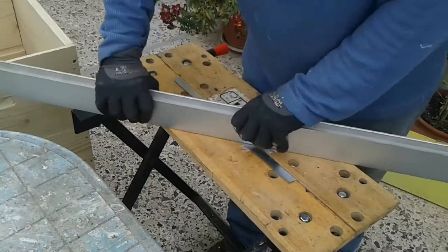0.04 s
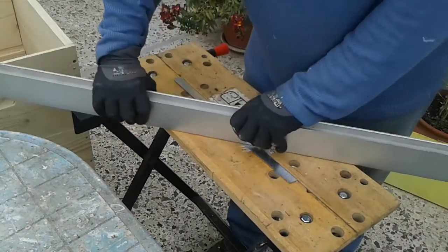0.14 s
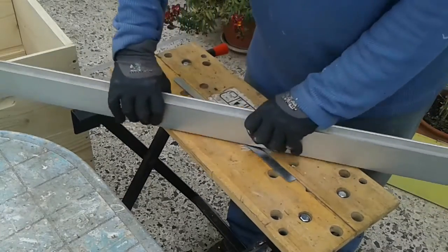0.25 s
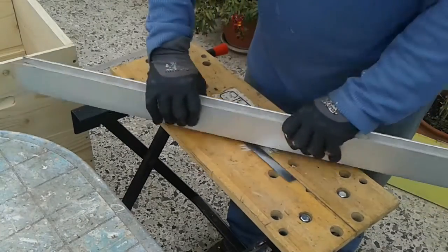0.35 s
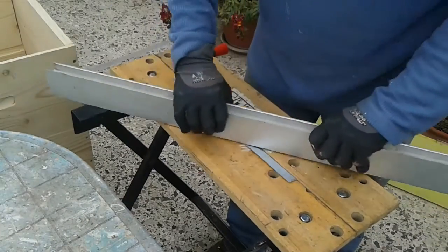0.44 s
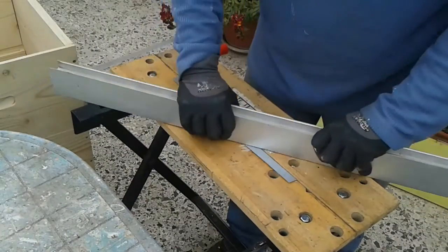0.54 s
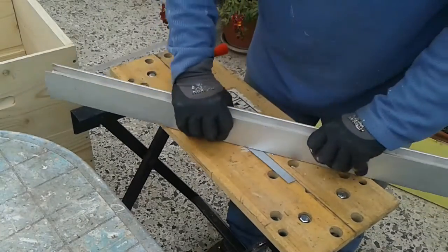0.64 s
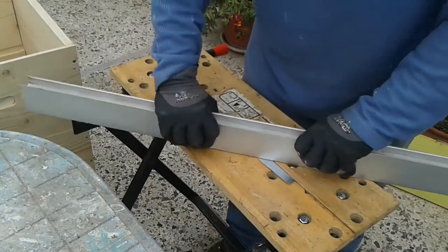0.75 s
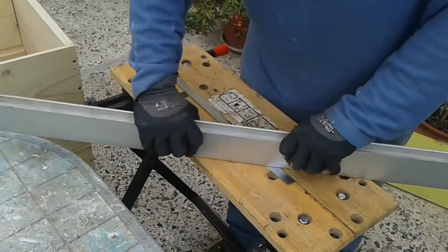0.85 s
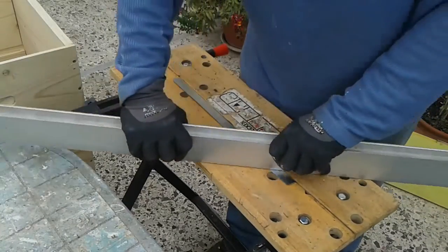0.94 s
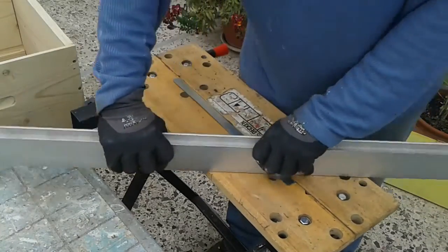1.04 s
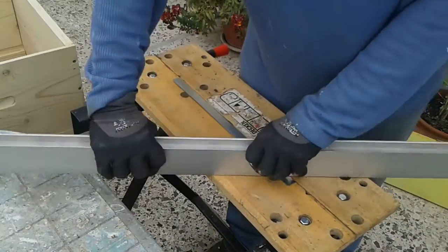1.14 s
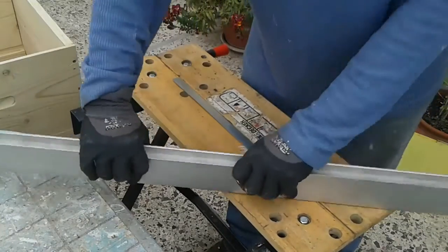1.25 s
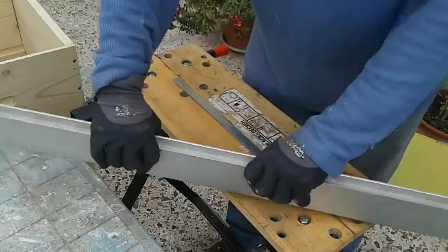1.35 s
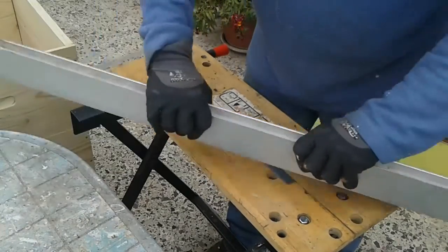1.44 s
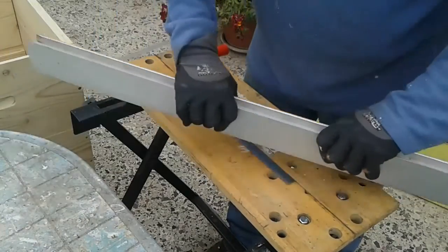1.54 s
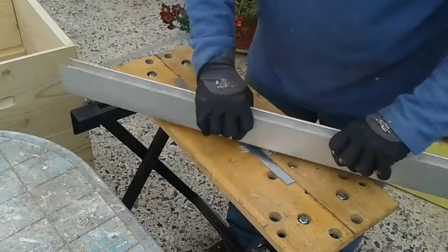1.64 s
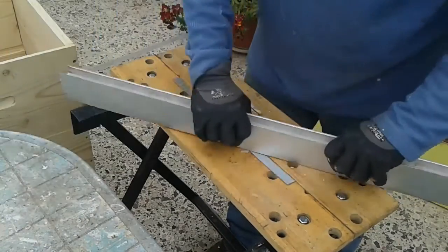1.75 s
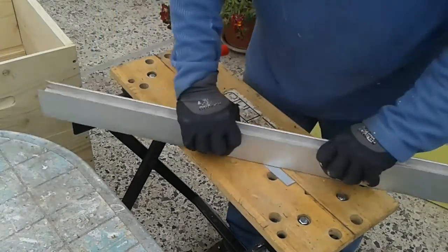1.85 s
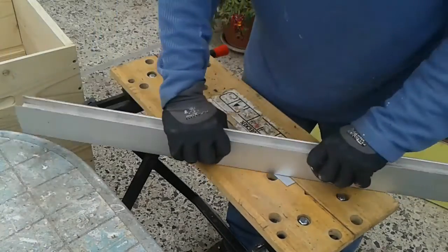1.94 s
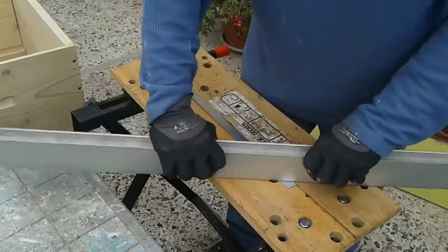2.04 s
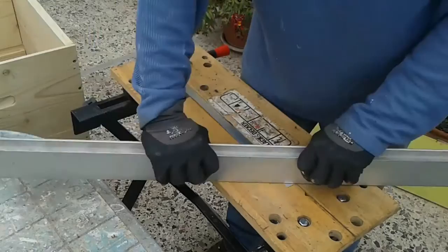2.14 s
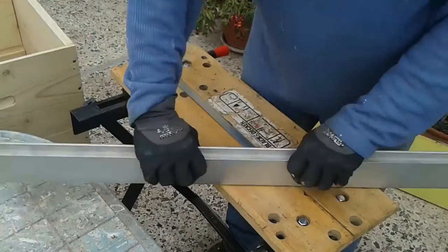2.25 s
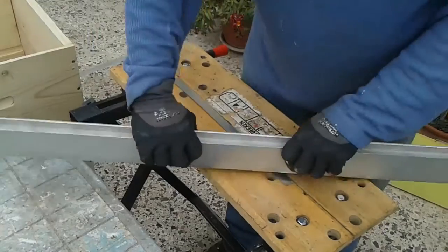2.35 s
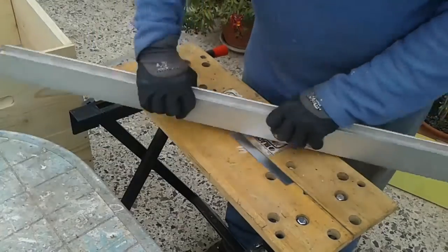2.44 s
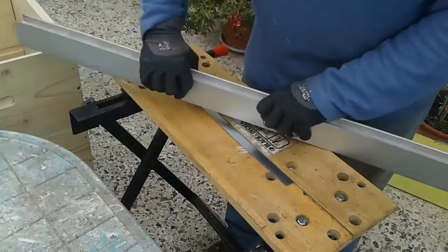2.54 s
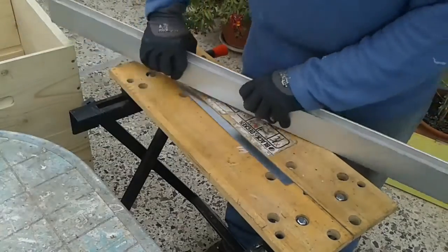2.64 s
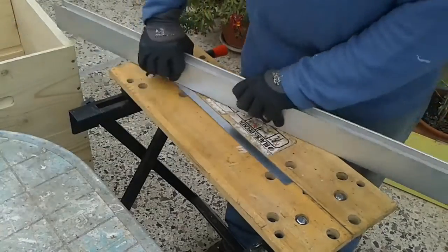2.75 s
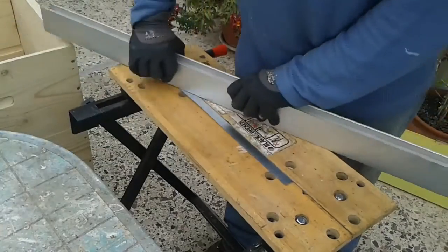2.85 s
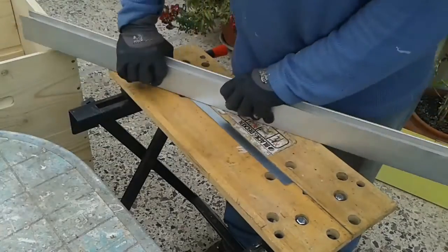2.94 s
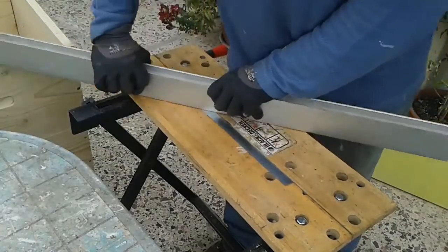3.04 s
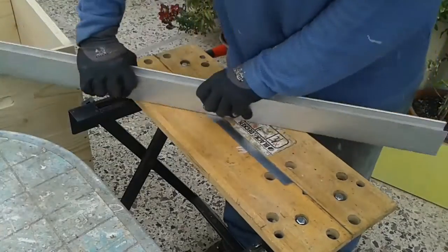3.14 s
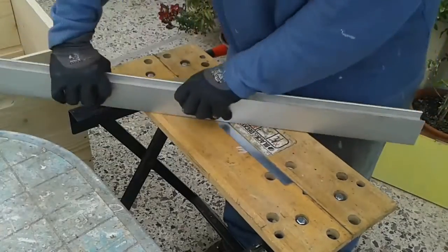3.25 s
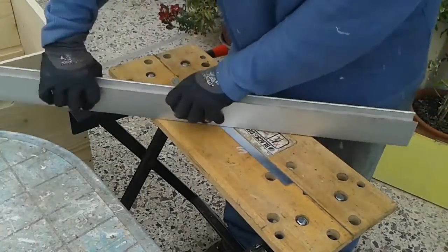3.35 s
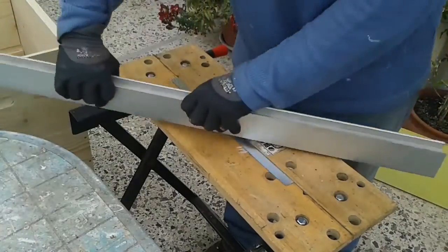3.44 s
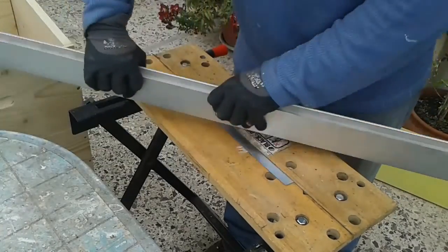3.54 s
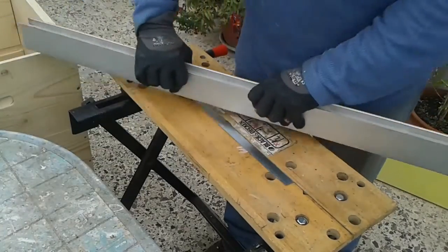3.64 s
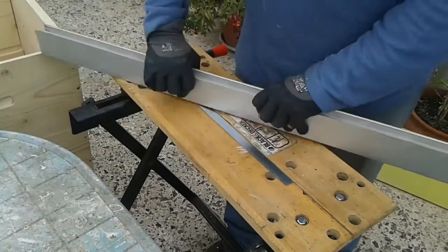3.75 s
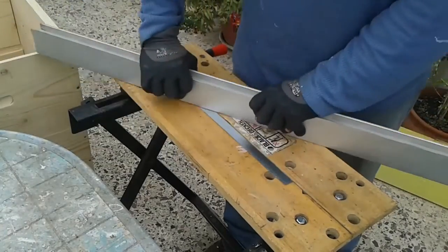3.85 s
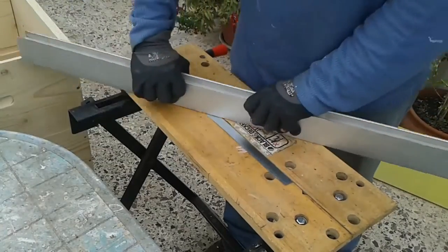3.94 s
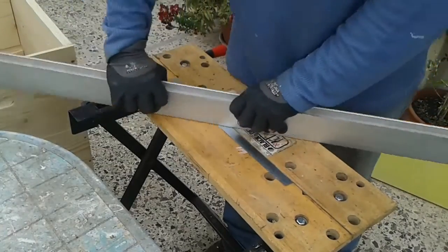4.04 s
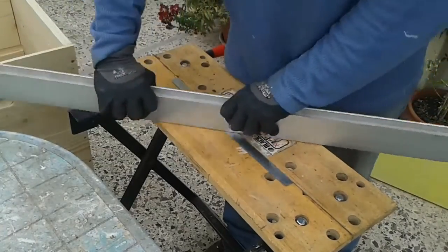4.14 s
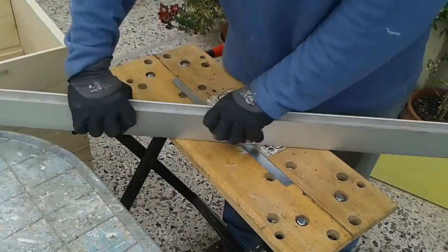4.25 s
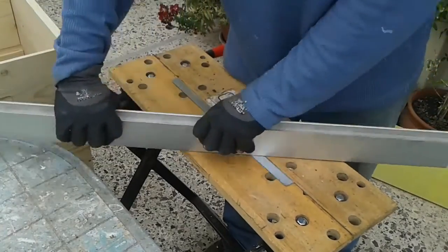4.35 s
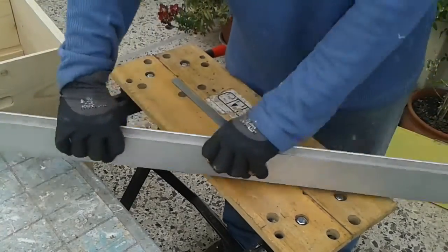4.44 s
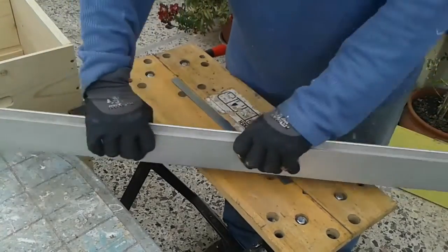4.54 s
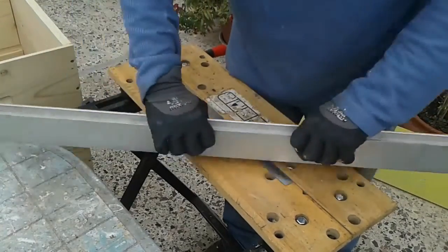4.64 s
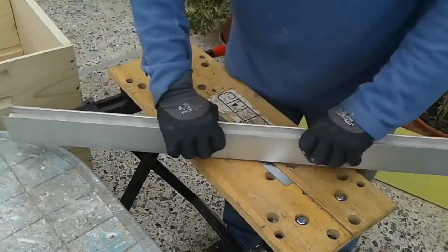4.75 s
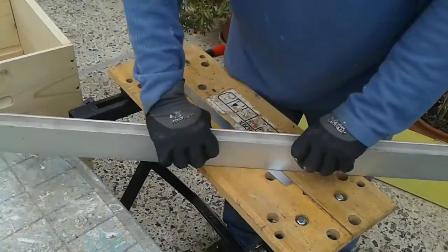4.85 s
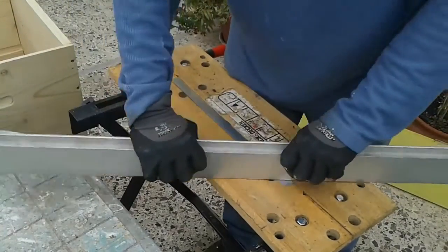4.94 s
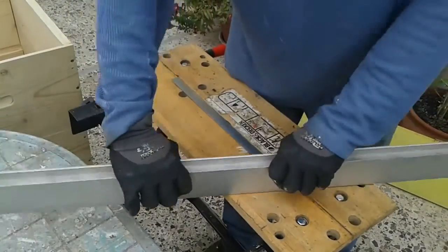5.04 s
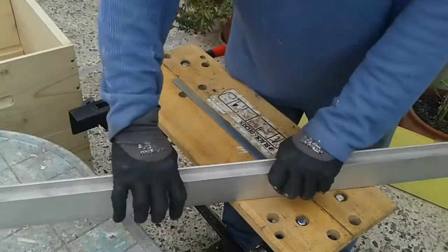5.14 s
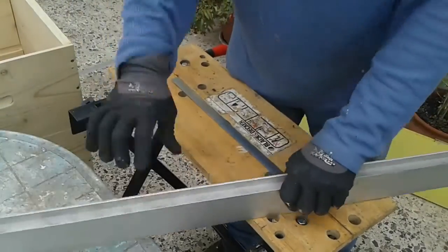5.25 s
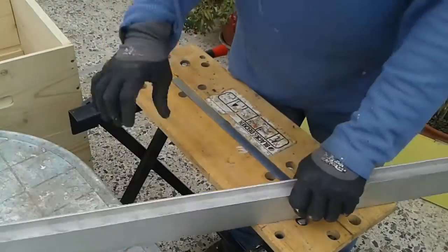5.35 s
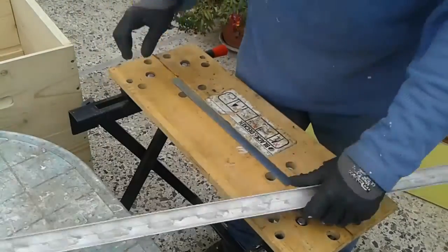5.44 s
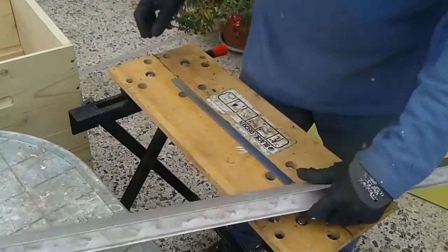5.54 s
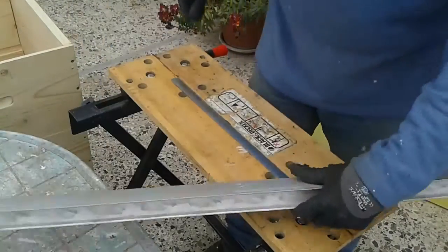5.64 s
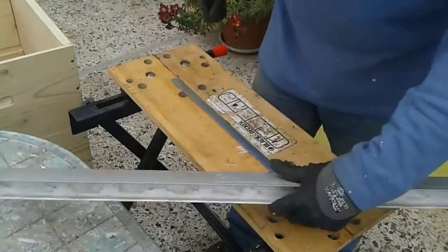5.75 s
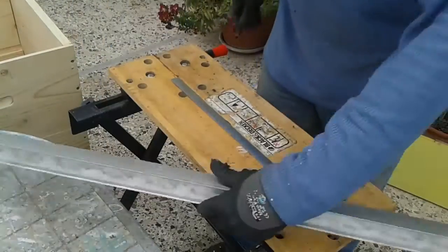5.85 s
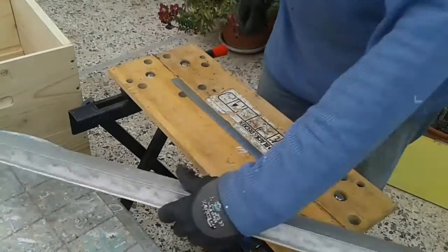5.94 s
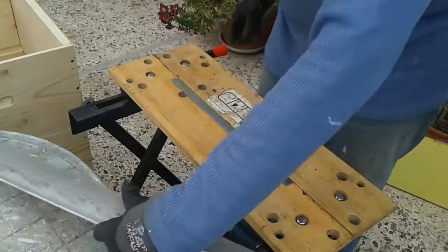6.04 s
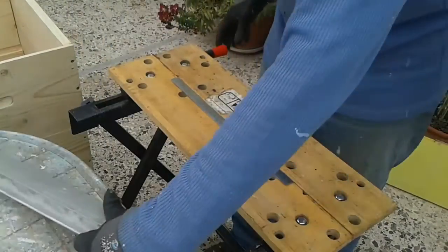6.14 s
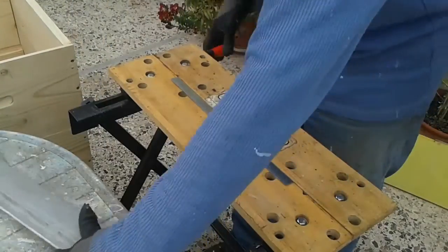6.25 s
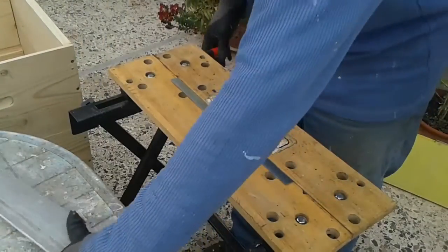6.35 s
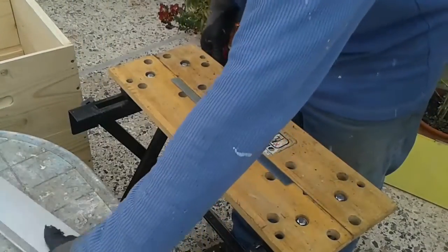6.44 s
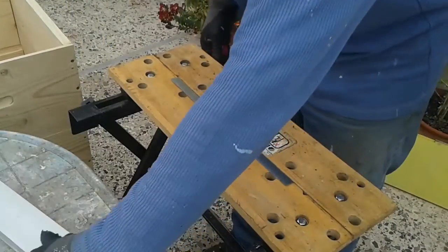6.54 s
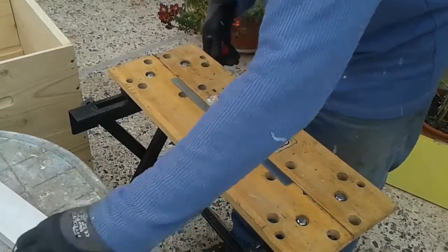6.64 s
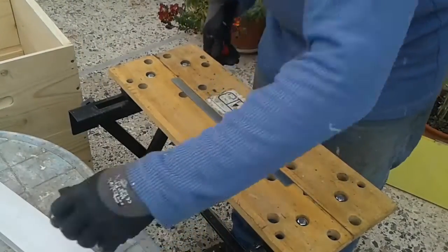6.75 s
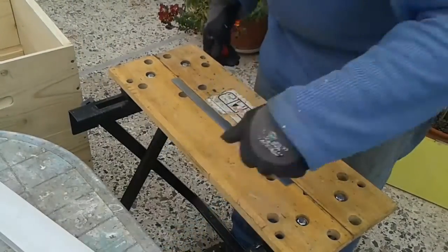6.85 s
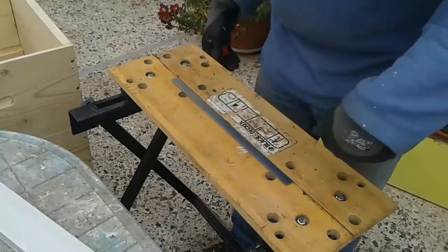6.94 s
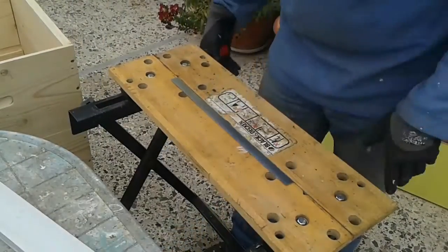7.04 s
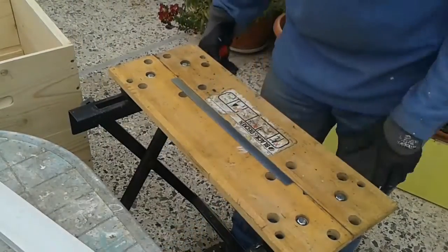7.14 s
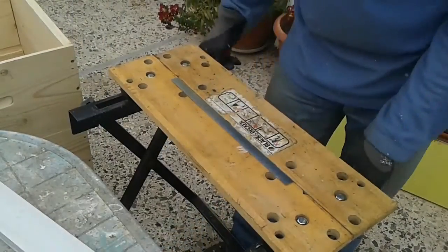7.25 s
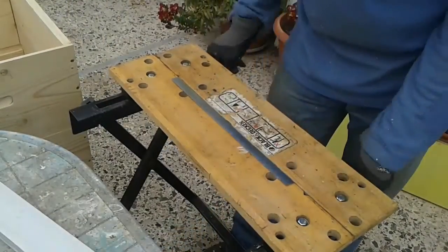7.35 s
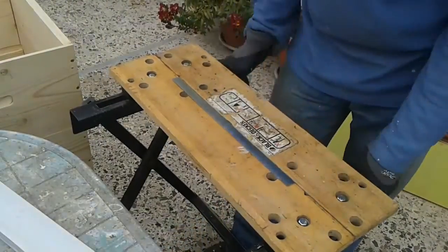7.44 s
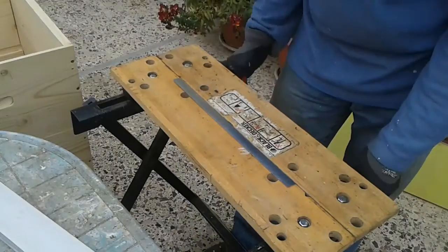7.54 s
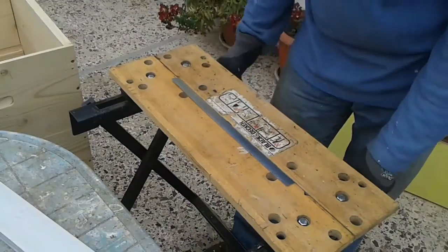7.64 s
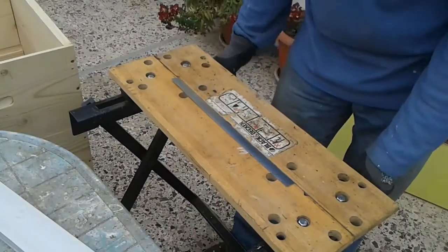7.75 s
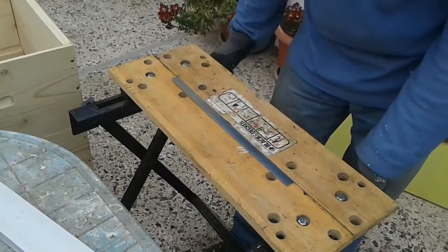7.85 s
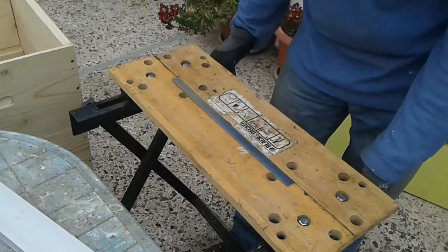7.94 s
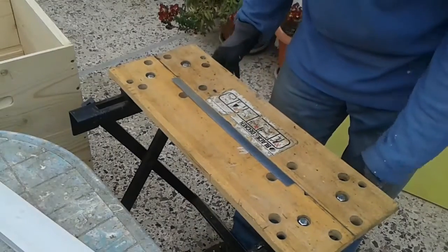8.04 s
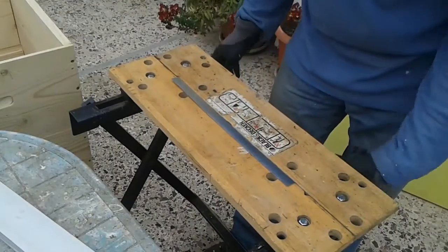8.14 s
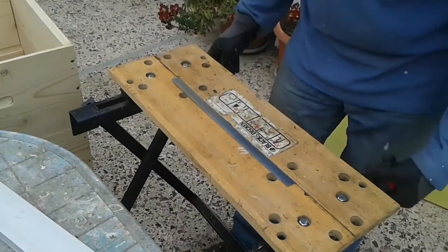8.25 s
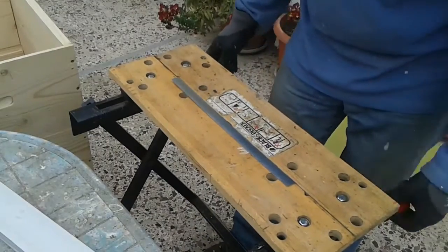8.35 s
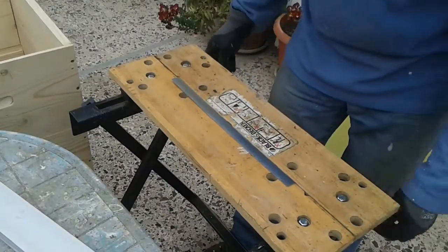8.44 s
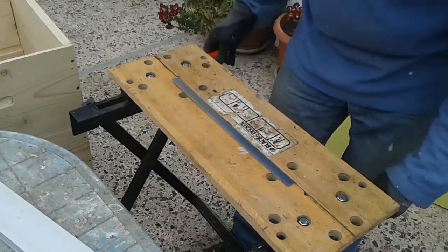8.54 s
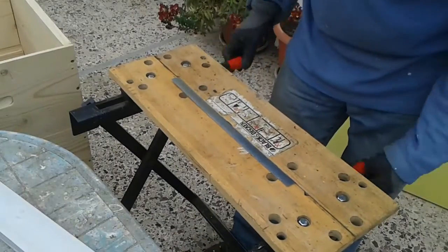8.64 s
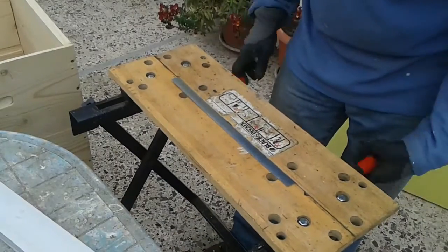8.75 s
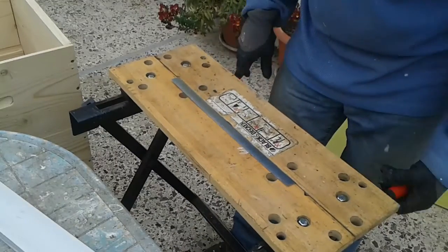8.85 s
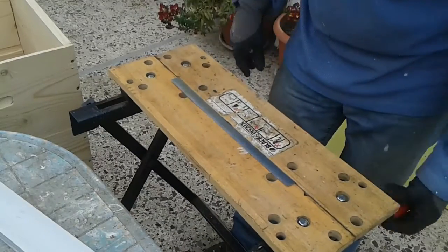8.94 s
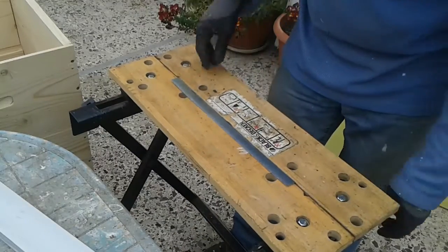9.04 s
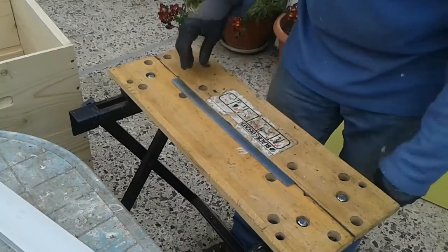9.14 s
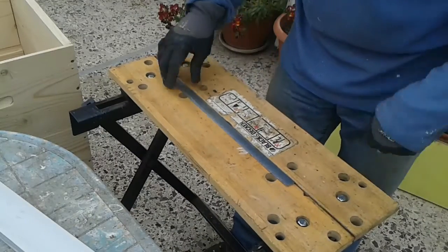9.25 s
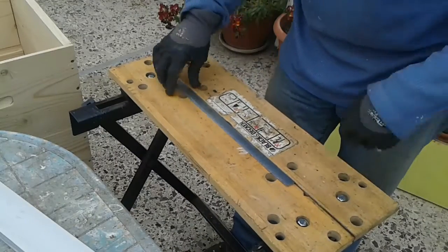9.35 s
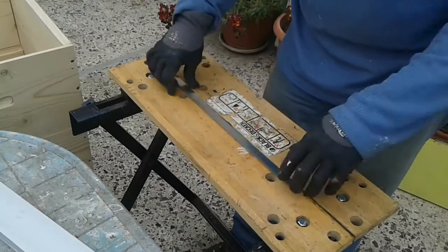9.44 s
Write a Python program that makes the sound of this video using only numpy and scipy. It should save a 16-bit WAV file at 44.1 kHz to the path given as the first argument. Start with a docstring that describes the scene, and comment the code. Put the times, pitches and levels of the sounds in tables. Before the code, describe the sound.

Harsh metal-on-wood scraping with hard knocks, a brief metallic ringing, a clattering drop on a table, then small clinks and rustling sleeves outdoors.

```python
"""A long thin metal strip, worked by gloved hands, is knocked down on a folding wooden workbench and dragged across it.
Friction noise makes the rasp; once one hand lets go, the same noise drives the strip's modes and it sings.
Blows on the bench, and then on a garden table, are noise cracks and decaying tails with ringing modes.
Hand tools clink, sleeves rub and a walled yard hums and hisses faintly: shaped noise and short steel modes.
One close microphone hears it all, with echoes from nearby surfaces."""
import sys
import numpy as np
from scipy import signal
from scipy.io import wavfile
from scipy.ndimage import uniform_filter1d

SR = 44100
rng = np.random.default_rng(int(sys.argv[2]) if len(sys.argv) > 2 else 0)


def wav_record(signal):
    """Record a signal, one row per channel, as 16-bit PCM in the file named by sys.argv[1]."""
    frames = np.transpose(np.atleast_2d(signal))
    bounded = np.clip(frames, -1, 1)
    # unit amplitude maps onto the largest positive 16-bit level
    quanta = np.round(bounded * 32767).astype(np.int16)
    wavfile.write(sys.argv[1], SR, quanta)


N = 418947
TIME = np.arange(N) / SR
HZ = np.fft.rfftfreq(4096, 1 / SR)  # frequency grid of the filters


def amp(db):
    """Level law: decibels to amplitude gain."""
    return 10 ** (np.asarray(db) / 20)


def evened(x):
    """Normalisation by effective value: scales to rms 1."""
    return x / np.sqrt(np.mean(x ** 2) + 1e-20)


def read(points, hz):
    """Interpolation of a curve along a logarithmic frequency axis."""
    point_hz, value = np.transpose(points)
    return np.interp(np.log(hz + 1), np.log(point_hz), value)


def add(mix, s, sound):
    """Superposition: sums a sound into the mix, in place, from time s."""
    part = mix[max(round(s * SR), 0):][:len(sound)]
    part += sound[:len(part)]


def colour(x, curve_db):
    """Minimum-phase filtering: a causal filter with the given gain over HZ keeps attacks sharp."""
    log_gain = np.log(amp(np.r_[curve_db, curve_db[-2:0:-1]]))
    spectrum = np.exp(np.conj(signal.hilbert(log_gain)))
    taps = np.fft.ifft(spectrum).real
    return signal.oaconvolve(x, taps)[:len(x)]


def band(x, edges, order=3):
    """Band-pass filtering between two edges in Hz."""
    return signal.sosfilt(signal.butter(order, edges, "band", fs=SR, output="sos"), x)


def swell(s, half_s):
    """Gaussian envelope: a smooth rise and fall, 1 at time s."""
    return np.exp(-((TIME - s) / half_s) ** 2)


def wander(lo_hz, hi_hz):
    """Slow random modulation: band-limited noise of rms 1."""
    return evened(band(rng.standard_normal(N), (lo_hz, hi_hz), order=1))


def patchy(x, depth_db, frames_size, bins_size):
    """Time-varying spectrum: random patches of it swell and fade."""
    z = signal.stft(x, nperseg=512, noverlap=384)[2]
    field = uniform_filter1d(rng.standard_normal(z.shape), frames_size, 1)
    field = uniform_filter1d(field, bins_size, 0)
    return signal.istft(z * amp(depth_db * evened(field)), nperseg=512, noverlap=384)[1][:len(x)]


def slips(per_s, spread_db, smooth_share):
    """Stick-slip friction: countless tiny slips of uneven size over a smooth hiss."""
    chance = rng.random(N)
    size = np.minimum(rng.exponential(1, N), 4)
    sign = rng.choice([-1, 1], N)
    grains = evened((chance < per_s / SR) * sign * amp(spread_db * size))
    return evened(grains + smooth_share * rng.standard_normal(N))


def ring(modes, t, scatter_db=2):
    """Modal superposition: decaying sines; each contact point excites them in different proportion."""
    chance = rng.standard_normal((len(modes), 2))
    total = 0
    for (hz, db, t60), (strength, polarity) in zip(modes, chance):
        decay = amp(db + scatter_db * strength - 60 * t / t60)
        total = total + np.sign(polarity) * decay * np.sin(2 * np.pi * hz * t)
    return total


def resonate(x, hz, width_hz):
    """Heterodyne resonance of unit gain: shifts the curve hz to zero, smooths, and shifts back."""
    turn = np.exp(2j * np.pi * np.cumsum(hz) / SR)
    r = np.exp(-np.pi * width_hz / SR)
    return 2 * (turn * signal.lfilter([1 - r], [1, -r], x / turn)).real


# spectrum of the yard's hum and hiss: freq_hz, gain_db
YARD_COLOUR = [(15, -66), (45, -13), (110, -0.5), (271, 0), (326, -3), (373, 5.5), (404, -2), (621, -9),
               (927, -5.5), (1030, -10.5), (3010, -17.5), (4380, -14.5), (7890, -23), (15000, -19)]
YARD_DB = -53  # rms


def yard():
    """Steady broadband background: a faint outdoor hum and hiss of filtered noise."""
    air = patchy(rng.standard_normal(N), depth_db=0.7, frames_size=20, bins_size=6)
    return amp(YARD_DB) * evened(colour(air, read(YARD_COLOUR, HZ)))


# spectrum of rubbed cloth: freq_hz, gain_db
CLOTH_COLOUR = [(100, -2), (400, 7), (1500, -2.5), (3500, -9.5), (5200, -6), (7000, -16.5), (15000, -18)]
# the arms move and the sleeves rub: centre_s, half_length_s, soft_rub_db, bright_swish_db
SLEEVES = [(0.5, 0.13, -53.5, -65), (1.584, 0.13, -52, -73), (3.69, .1, -54.5, -64), (5.975, .06, -74, -59),
           (6.975, 0.19, -55, -77), (7.265, 0.033, -75, -54.5), (7.677, 0.28, -56.5, -56.5),
           (8.41, 0.33, -50.5, -74), (8.944, 0.22, -48.5, -71), (9.233, 0.21, -51.5, -80)]


def rustle():
    """Fibre friction: soft rubbing and brighter swishes of cloth while the arms move."""
    friction = slips(per_s=1200, spread_db=2.5, smooth_share=1.0)
    sound = colour(patchy(friction, depth_db=3.5, frames_size=20, bins_size=8), read(CLOTH_COLOUR, HZ))
    soft = evened(sound)
    bright = evened(band(sound, (3000, 7000), order=1))
    return sum(swell(s, half) * (amp(rub) * soft + amp(swish) * bright) for s, half, rub, swish in SLEEVES)


# spectrum of a blow: freq_hz, gain_db
BLOW_COLOUR = [(25, -9), (55, -27), (85, -3.5), (140, 6), (400, 3), (1000, -2), (2000, -2), (3500, -6),
               (5500, -7.5), (6500, -17), (8000, -27.5), (11000, -35), (15000, -42)]
# die-away between the yard walls, before each blow's stretch: freq_hz, t60_s
TAIL = [(80, 0.57), (250, 0.39), (700, 0.37), (2000, 0.24), (5000, 0.25), (12000, 0.34)]
# bands of thud, body and click: low_edge_hz, high_edge_hz
BANDS = [(80, 500), (500, 2500), (2500, 8000)]


def blow(t, levels_db, crack_db, crack_s, rise_s, stretch, modes=0, tint_db=0):
    """Impact excitation: a crack of a few ms, a dense tail of crowded modes and echoes, and a few clear modes."""
    tail_noise, crack_noise = rng.standard_normal((2, len(t)))
    hz, age, z = signal.stft(tail_noise, SR, nperseg=128)
    t60 = stretch * read(TAIL, hz)[:, None]
    tail = signal.istft(z * amp(-60 * age / t60), nperseg=128)[1][:len(t)]
    crack = amp(crack_db) * crack_noise * np.exp(-t / crack_s)
    sound = colour(tail + crack, read(BLOW_COLOUR, HZ) + tint_db) + modes
    sound = sound * (1 - np.exp(-t / rise_s))
    # place and force of the contact set the balance of thud, body and click, gauged over the first 16 ms
    found_db = [20 * np.log10(np.std(band(sound, edges)[:705])) for edges in BANDS]
    thud, body, click = np.subtract(levels_db, found_db)
    return colour(sound, read([(300, thud), (700, body), (1800, body), (3200, click)], HZ))


# hand tools are picked up, band levels as aimed for in blow():
# start_s, thud_db, body_db, click_db, contact_sharpness_db, hollow_note_hz, note_gain_db
TOOLS = [(7.435, -42.5, -43, -49, -6, 396, 18), (7.463, -44, -45.5, -46.5, 6, 430, -3),
         (7.776, -37.5, -34, -41, -5, 415, 12.5), (7.797, -43, -30, -31, -4, 2800, 8),
         (7.821, -49, -47, -36.5, -8, 3200, -1), (8.207, -49, -47.5, -43, -6.5, 4300, 2),
         (8.293, -49, -45.5, -43, 8, 2600, 3), (8.51, -53, -38.5, -33, 0.5, 2400, 12.5),
         (8.639, -61, -47.5, -52, 0, 1480, 3), (8.749, -51, -41.5, -40.5, -7, 5800, -1),
         (8.841, -49, -39.5, -44.5, -15, 1285, 13), (8.922, -50, -33, -34.5, 4, 910, 8),
         (9.001, -48.5, -35, -23, 1, 5760, 5)]


def tools(t, crack_db=10, note_octaves=0.34, clink_db=-18, clink_t60=0.048, level_db=0):
    """Damped impact below the bench: a hollow note, six short steel modes and a longer yard echo."""
    out = np.zeros(N)
    bright = read([(6000, 3.0), (8000, 3.6)], HZ)
    for s, thud, body, click, sharp, hz, note_db in TOOLS:
        octaves_away = np.log2((HZ + 1) / hz)
        note = note_db / (1 + (octaves_away / note_octaves) ** 2)
        steel = ring([(f, clink_db, clink_t60) for f in rng.uniform(1967, 6000, size=6)], t)
        clink = blow(t, (thud, body, click), crack_db + sharp, crack_s=0.0041, rise_s=0.00058,
                     stretch=1.2, modes=steel, tint_db=note + bright)
        add(out, s, clink)
    return amp(level_db) * out


# modes of the table: freq_hz, relative_level_db, t60_s
TABLE = [(65.4, -13, 0.18), (93.7, -21, 0.42), (145.4, -12, 0.13), (176.6, 2.5, 0.243), (292, -1.5, 0.18),
         (437, -10, 0.18), (599, 9, 0.062), (828, -3, 0.2), (1151, 4.5, 0.084)]
# modes of the strip, t60 hanging free before any damping: freq_hz, struck_level_db, rubbed_level_db, t60_s
STRIP = [(1680, -8, -33, 0.19), (1743, -1.5, 1, 0.22), (1807, -17, -16, 0.35), (2307, 2.5, 5, 0.15),
         (2365, -27, -2, 0.22), (2760, 4.5, 4, 0.13), (3230, -7.5, -5, 0.38), (3580, -24, -7, .4),
         (3760, -14, -11, 0.56), (3800, -13, -12, 0.45), (4590, -7, 2.5, 0.28), (5100, -23, -19, .35),
         (5390, -10.5, -23, 0.6), (5370, -13.5, -20, 0.22), (6230, -15.5, -9, .3), (7200, -24, -13, 0.28),
         (8580, -45, -5, 0.28)]
# the strip lands on the table, band levels as aimed for in blow():
# start_s, thud_db, body_db, click_db, contact_sharpness_db, rise_s, strip_ring_db, tail_stretch (factor)
DROPS = [(6.3509, -20, -17, -20.5, -0.5, 0.002, -0.5, 1.6),
         (6.4654, -24, -20, -33.5, -22, 0.00058, -4, 0.87),
         (6.5145, -15, -15, -19.5, -7, 0.00036, -7, 1.03),
         (6.7353, -20.5, -21.5, -17.5, 1.5, 0.0011, -11, 0.97),
         (6.758, -15.5, -18, -17.5, 4, .0002, -8, 0.96)]


def drops(t, top_db=-10, metal_db=1, crack_db=8, damping=0.69, spent_s=0.0095, lasting_db=-11.0,
          chatter_db=1.0, level_db=0):
    """Contact damping: bouncing and then lying flat, the strip sheds most of its ring at once; the rest chatters."""
    out = np.zeros(N)
    soft_top = read([(6000, 1), (9000, -1.2)], HZ)
    for s, thud, body, click, sharp, rise, clang, stretch in DROPS:
        metal = 0
        for hz, db, _, t60 in STRIP:
            mode = ring([(hz, db, t60 * damping)], t)
            flutter = evened(band(rng.standard_normal(len(t)), (20, 160), order=1))
            metal = metal + mode * amp(chatter_db * flutter)
        metal = metal * (np.exp(-t / spent_s) + amp(lasting_db))
        modes = amp(top_db) * ring(TABLE, t, scatter_db=3.5) + amp(metal_db + clang) * metal
        landing = blow(t, (thud, body, click), crack_db + sharp, crack_s=0.0084, rise_s=rise,
                       stretch=stretch, modes=modes, tint_db=soft_top)
        add(out, s, landing)
    return amp(level_db) * out


# modes of the wooden bench top: freq_hz, relative_level_db, t60_s
BENCH = [(147.8, 5.5, 0.19), (274, -19, 0.3), (348.3, 13.5, 0.12), (424.6, 2, 0.36), (699, -1, 0.12),
         (912, 8.5, 0.12), (1317, -16, 0.077), (1423, -1, 0.19)]
# modes of the steel frame: freq_hz, relative_level_db, t60_s
FRAME = [(2005, 0, 0.43), (2654, -14, 0.4), (4060, -19, .2)]
# the strip lands on the bench, band levels as aimed for in blow(): start_s, thud_db, body_db, click_db, rise_s
KNOCKS = [(0.6203, -28.5, -23.5, -23.5, .001), (0.673, -32, -28, -32, 0.0011),
          (1.911, -25, -18.5, -15.5, 0.0009), (2.7252, -41, -43.5, -52.5, 0.0011),
          (2.8941, -34, -32, -19.5, 0.0017), (2.913, -24.5, -16.5, -20.5, 0.00017),
          (3.172, -37, -32.5, -46, .001), (3.921, -32, -21, -19, 0.00072),
          (3.9496, -25.5, -14, -23.5, 0.00018), (4.9152, -27, -21.5, -23, 0.0016),
          (4.96, -24.5, -36, -35.5, 0.0011), (5.371, -38, -31.5, -35, .0007)]
# a harder click comes from a sharper contact: sharpness at a 0 dB click, and its change with the click
SHARPEST_DB, SHARP_DB_PER_DB = 6.5, .17
# one blow lands over the steel frame and makes it ping; the frame rings faintly under the others
PING_S, PING_DB, FAINT_PING_DB = 3.95, -10, -25


def knocks(t, wood_db=-19, crack_db=11, level_db=-0.5):
    """Modal excitation by impact: the strip strikes the wooden top and also sets the steel frame ringing."""
    out = np.zeros(N)
    for s, thud, body, click, rise in KNOCKS:
        clang = PING_DB if abs(s - PING_S) < .01 else FAINT_PING_DB
        sharp = SHARPEST_DB + SHARP_DB_PER_DB * click
        wood = amp(wood_db) * ring(BENCH, t, scatter_db=1.5)
        steel = amp(clang) * ring(FRAME, t, scatter_db=5.5) / 2
        bright = read([(5500, 0), (7500, sharp - 1.5)], HZ)  # a sharp contact reaches higher
        knock = blow(t, (thud, body, click), crack_db + sharp, crack_s=0.0068, rise_s=rise,
                     stretch=1.05, modes=wood + steel, tint_db=bright)
        add(out, s, knock)
    return amp(level_db) * out


# the strip is pulled over the wood, the rumble being the board's:
# start_s, length_s, rasp_db, rumble_relative_to_rasp_db, speeding_up_s, slowing_down_s
PULLS = [(0.0, 0.078, -33.5, -9, 0.0017, 0.16), (0.33, 0.055, -40, -4.5, 0.0088, 0.063),
         (0.765, 0.71, -35, -8.5, 0.1, 0.034), (1.954, 0.2, -37.5, -4.5, 0.092, .06),
         (2.17, .16, -36.5, -7, 0.12, 0.12), (2.742, 0.13, -53, 0, .03, 0.022),
         (2.956, 0.63, -34, -7, 0.17, 0.036), (4.028, 0.13, -31.5, -8.5, 0.18, 0.067),
         (4.2, 0.41, -32.5, -8.5, 0.13, 0.048), (5.002, 0.098, -26.5, -6.5, 0.27, 0.1),
         (5.204, 0.3, -30.5, -10.5, 0.19, 0.032), (5.56, .05, -39.5, -5, 0.025, 0.039),
         (5.657, 0.028, -46.5, -4, .025, .04), (6.557, 0.156, -38, 0, 0.042, 0.03)]
# the hands bear down and the edge bites: centre_s, half_length_s, rasp_gain_db, rumble_gain_db
BITES = [(0.875, 0.038, 4.5, 6), (1.41, 0.043, 10, 10), (2.116, 0.017, 6.5, 9), (2.41, .04, -1.5, 2.5),
         (3.095, .022, 2.5, 3.5), (3.531, 0.024, 4.5, 2.5), (4.535, 0.047, 9, 5.5), (4.592, 0.021, 8, 0.5),
         (6.684, 0.022, 9, -8.5)]
RUMBLE_POWER = 0.68  # exponent of the rumble's strength over speed; the rasp's is 1


def pulling():
    """Speed-dependent friction: rasp and rumble follow each pull as it speeds up, holds and slows; bites alter both."""
    rasp, rumble = np.zeros((2, N))  # powers, summed over the pulls
    for s, length, db, share, rise, fall in PULLS:
        speeding_up = np.sin(np.pi / 2 * np.clip((TIME - s) / rise, 0, 1))
        slowing_down = np.where(TIME < s + length, 1, swell(s + length, fall))
        speed = speeding_up * slowing_down
        rasp += (amp(db) * speed) ** 2
        rumble += (amp(db + share) * speed ** RUMBLE_POWER) ** 2
    bite_db = sum(np.outer([rasp_gain, rumble_gain], swell(s, half)) for s, half, rasp_gain, rumble_gain in BITES)
    return np.sqrt([rasp, rumble]) * amp(bite_db)


# spectrum of metal rasping on wood: freq_hz, gain_db
RASP_COLOUR = [(40, -32), (100, -7), (200, -5), (340, -2.5), (520, -5.5), (900, -6), (1500, -6), (2200, -5),
               (3000, -2), (4300, -0.5), (5600, 1), (7000, -4), (9300, -13), (15000, -20)]
# the edge catches and rips free: start_s, level_db, decay_s
CATCHES = [(0.344, -36, 0.0029), (0.374, -36, 0.0098), (2.472, -44, 0.01), (3.1, -41, 0.0054),
           (3.103, -26.5, .006), (3.13, -45, 0.0049), (3.186, -41, 0.0059), (4.53, -36, 0.007),
           (4.596, -38, .005), (4.601, -16.5, 0.0064), (4.952, -26.5, 0.0072)]
# the edge whistles, its pitch wandering by this rms share as the contact slides
WHISTLE_HZ, WHISTLE_WANDER = 5160, 0.058


def scraping(t, rasp_db=0, rumble_db=0, catch_db=0, judder_db=-0.47, whistle_db=-2, whistle_width_hz=450):
    """Friction-driven radiation: the edge rasps over the bench, and the moving contact shifts which parts speak."""
    force = slips(per_s=1600, spread_db=0.5, smooth_share=1.0) * amp(judder_db * wander(5.5, 47))
    sound = colour(patchy(force, depth_db=2.5, frames_size=14, bins_size=2), read(RASP_COLOUR, HZ))
    whistle_hz = WHISTLE_HZ * (1 + WHISTLE_WANDER * wander(1.5, 3.7))
    sound = sound + amp(whistle_db) * resonate(sound, whistle_hz, whistle_width_hz)
    high = band(sound, (2200, 19000))
    low = band(sound, (45, 2200))
    high = high / np.std(band(high, (2500, 9000)))
    low = low / np.std(band(low, (200, 2000)))
    rasp, rumble = pulling()
    out = amp(rasp_db) * rasp * high + amp(rumble_db) * rumble * low
    for s, db, decay_s in CATCHES:
        rip = np.exp(-t / decay_s) * high[round(s * SR):][:len(t)]
        add(out, s, amp(catch_db + db) * rip)
    return out


# one hand lets go and the strip comes free, until it lands on the table;
# HELD_DB is the drive of the modes when held, FREE_DB the gain added as it loosens (their sum stops at 1)
LET_GO_S, LOOSEN_S, HELD_DB, FREE_DB = 5.17, 0.18, -25, 5


def singing(rasp, t, modes_db=-10.0, crowd_db=-4, crowd_t60=0.18, glove_damping=0.66, flex=0.0042):
    """Forced resonance: damped when held, the strip hangs from one glove and sings; flexing wavers its pitch."""
    loose = np.clip((TIME - LET_GO_S) / LOOSEN_S, 0, 1) ** 2 * (TIME < DROPS[0][0])
    free = np.minimum(amp(HELD_DB) + amp(FREE_DB) * loose, 1)
    # a few strong modes and a crowd of weak ones
    strong = ring([(hz, db, t60 * glove_damping) for hz, _, db, t60 in STRIP], t, scatter_db=1)
    crowd = rng.standard_normal(len(t)) * amp(-60 * t / crowd_t60)
    crowd = colour(crowd, read([(300, 7.5), (2000, -0.5), (5300, -6), (7500, 3.5)], HZ))
    response = amp(modes_db) * strong / np.linalg.norm(strong) + amp(crowd_db) * crowd / np.linalg.norm(crowd)
    driven = signal.oaconvolve(rasp * free, response)[:N]
    # reading at a wavering speed bends the pitch by a small share
    wavering_time = TIME + flex * np.cumsum(wander(2.14, 12)) / SR
    sung = np.interp(wavering_time, TIME, driven)
    direct = rasp * np.sqrt(np.maximum(1 - 0.58 * free ** 2, 0))
    return direct + sung


# first echoes off the bench top, the body, the paving and the walls: delay_s, relative_level_db
ECHOES = [(.0017, -28), (.0041, -46.5), (.0067, -21), (.0093, -15), (0.0151, -18), (0.0205, -18)]


def echoed(x):
    """Early reflection: nearby surfaces repeat each sound; the sum is scaled to offset the added power."""
    out = x.copy()
    for delay, db in ECHOES:
        add(out, delay, amp(db) * x)
    return out / np.sqrt(1 + sum(amp(db) ** 2 for _, db in ECHOES))


def scene():
    """Superposition of all sources at one microphone, the same in both channels."""
    t = np.arange(SR * 3 // 4) / SR  # time axis of a single blow or response
    blows = knocks(t) + drops(t) + tools(t)
    strip = singing(scraping(t), t)
    mono = echoed(blows + strip + rustle()) + yard()
    return np.array([mono, mono])


EDGE_HZ = 15300  # upper band limit


def record(dry):
    """Overload and band limitation: peaks beyond 0.7 are clipped at the microphone, then a low-pass follows."""
    clipped = np.clip(dry, -.7, .7)
    low_pass = signal.firwin(511, EDGE_HZ, window=("kaiser", 9), fs=SR)
    return signal.oaconvolve(clipped, low_pass[None], "same")


dry = scene()
out = record(dry)
wav_record(out)
```